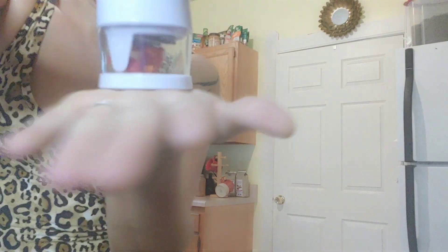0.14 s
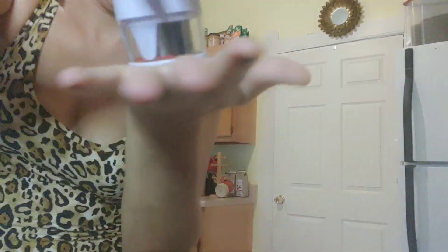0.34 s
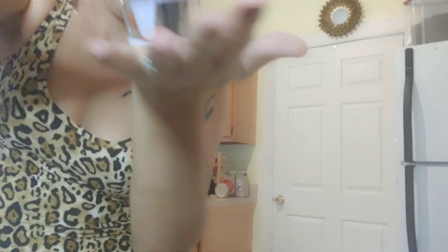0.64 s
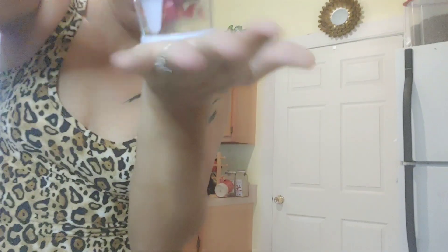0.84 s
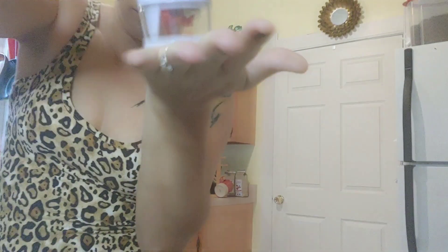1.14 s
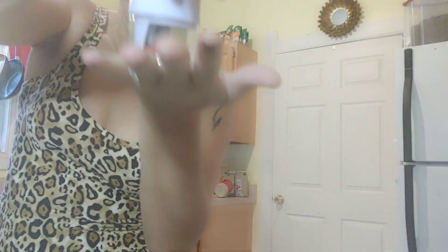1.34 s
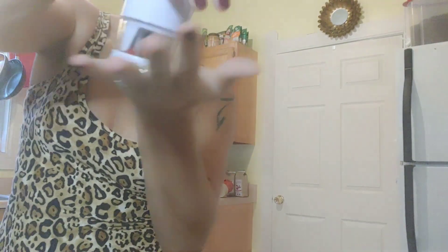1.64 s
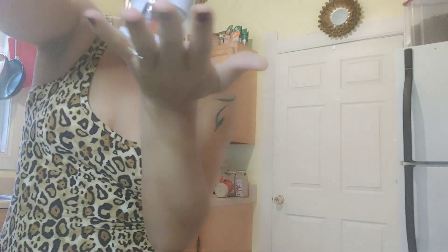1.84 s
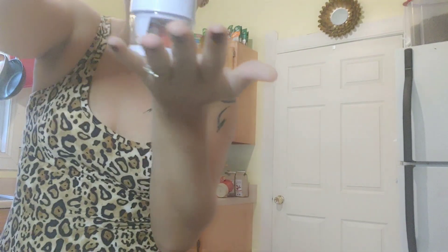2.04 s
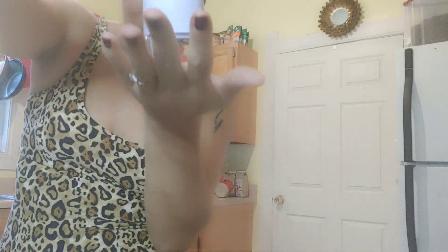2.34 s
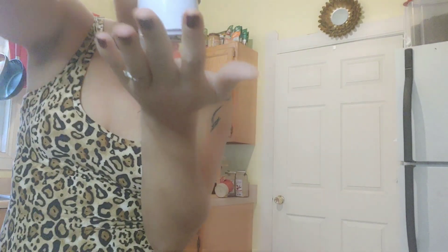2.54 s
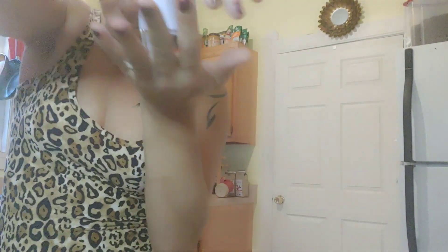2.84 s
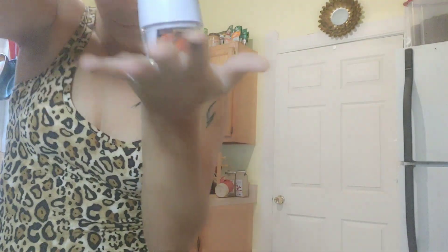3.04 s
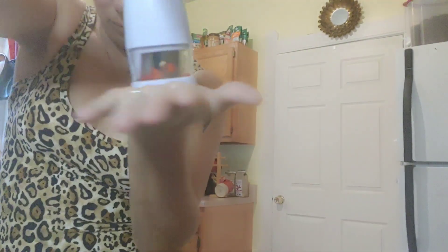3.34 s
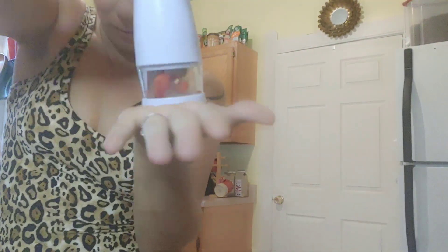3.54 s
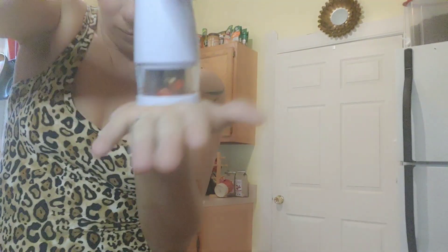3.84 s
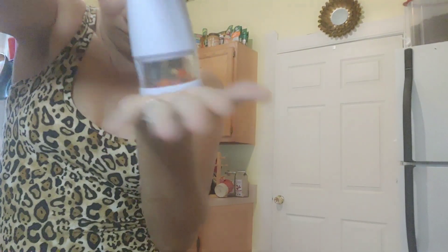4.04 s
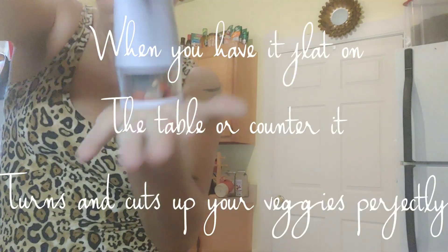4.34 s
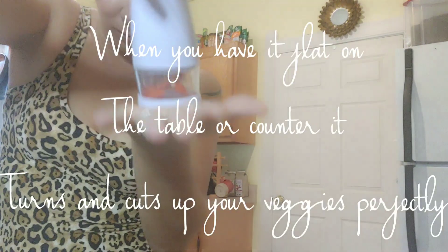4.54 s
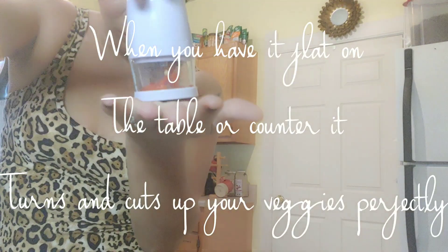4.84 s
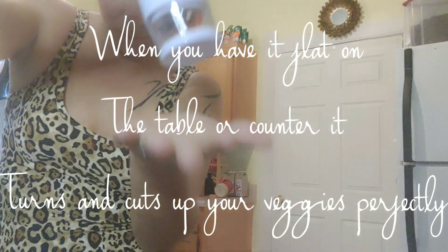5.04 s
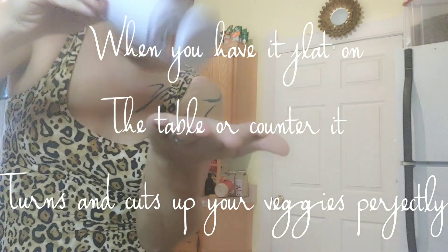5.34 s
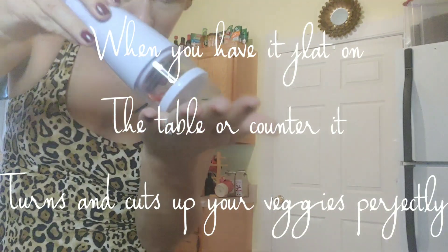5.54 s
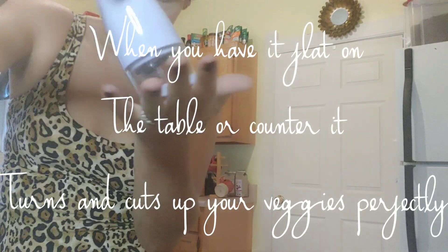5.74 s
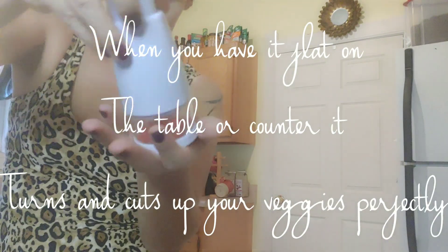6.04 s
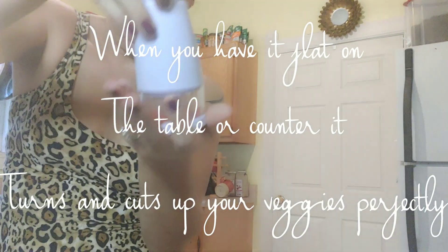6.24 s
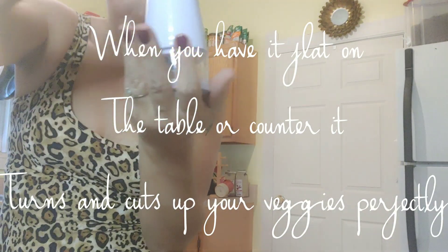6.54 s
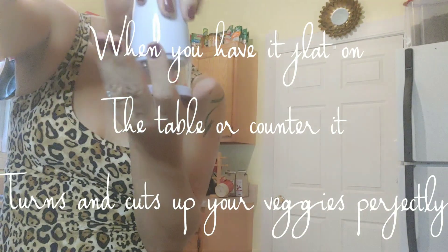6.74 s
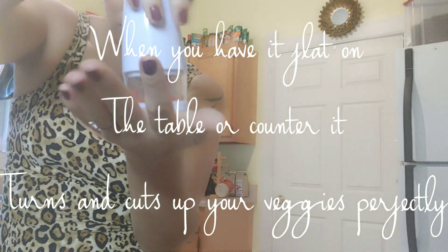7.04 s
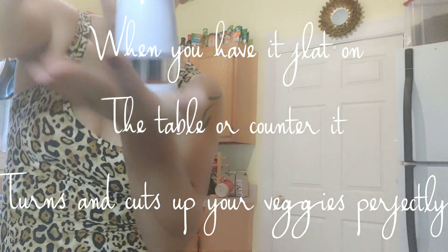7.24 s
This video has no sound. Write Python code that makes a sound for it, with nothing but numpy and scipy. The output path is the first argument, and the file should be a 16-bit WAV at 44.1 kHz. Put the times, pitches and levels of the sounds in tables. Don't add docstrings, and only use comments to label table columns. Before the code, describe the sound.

In a hard-walled kitchen with a low fridge hum, a hand-pumped plastic chopper works close to a stereo phone. From 0.1 to 1.8 s, six pushes about a third of a second apart give hollow, bright plastic knocks; between them the spring drives the plunger back with a gritty scrape, a rising squeak near 2 kHz, a brief steel rasp and a stop click. The clatter dies into short room echoes. From 2.1 s there is only a faint slip and a nail tick at 2.3, the background dipping before 2.8. A sharp return click at 2.8 begins a faster spell, strokes every quarter second from 3.0 until 4.5, with stronger rasps. Small finger knocks and slips come at 5.2 and 5.4, then faint nail ticks. Around 6.45 something hollow is set down across the room with dull double taps. After near quiet, one squeaky return clicks at 7.25.

```python
import sys
import numpy as np
from scipy import signal
from scipy.fft import rfft, irfft, next_fast_len
from scipy.io import wavfile
from scipy.ndimage import uniform_filter1d

SR = 44100
rng = np.random.default_rng(int(sys.argv[2]) if len(sys.argv) > 2 else 0)


def store_wav(level_fs):
    pcm = np.round(np.clip(np.atleast_2d(level_fs), -1, 1) * 32767)
    wavfile.write(sys.argv[1], SR, pcm.T.astype(np.int16))


def ratio(d):
    e = np.asarray(d, float) / 20
    return 10 ** e


N = 325458

# (time [s], force [dB], hardness [dB], cup ring [Hz])
PUSH_KNOCKS = [(.148, -25, 1.5, 937), (.481, -19, 3, 1116), (.818, -21.5, 0, 924), (1.149, -17, 3, 983),
               (1.469, -18.5, -6, 943), (1.796, -21.5, -11, 1014), (3.016, -22.5, -6, 958),
               (3.279, -18, -15, 1035), (3.535, -22, -8.5, 1484), (3.766, -24, -2, 966),
               (3.993, -18, -19, 1398), (4.226, -22.5, 3.5, 954), (4.495, -21, -1, 1100)]
# (time [s], force [dB], hardness [dB], cup ring [Hz])
RETURN_KNOCKS = [(.243, -25, 2, 1191), (.596, -17.5, 0, 1380), (.945, -17.5, 0, 977),
                 (1.26, -24.5, 5.5, 1285), (1.576, -20, 5, 1300), (2.817, -16, -5, 1600),
                 (3.112, -23.5, -1, 1424), (3.372, -28.5, 14, 1103), (3.608, -23.5, -17, 1500),
                 (3.844, -29.5, 15.5, 1706), (4.066, -25, 15.5, 1100), (4.289, -23, 2.5, 1189),
                 (7.26, -29.5, 15.5, 1554)]


def unit(x):
    return x / np.sqrt(np.mean(x ** 2) + 1e-20)


def along(points, hz):
    f, v = np.transpose(points)
    return np.interp(np.log(hz + 1), np.log(f + 1), v)


def filtered(x, response):
    n = x.shape[-1]
    m = next_fast_len(n + 8192)
    return irfft(rfft(x, m) * response(np.fft.rfftfreq(m, 1 / SR)), m)[..., :n]


def ringing(x, modes):
    def response(hz):
        total = 0
        for k, (centre, width, db) in enumerate(modes):
            damping = 1j * hz * width
            total = total + (-1) ** k * ratio(db) * damping / (centre ** 2 - hz ** 2 + damping)
        return total

    click = np.eye(1, 512)[0]
    return filtered(x, response) / np.abs(filtered(click, response)).max()


def diffuse(pair, spectrum):
    # (frequency [Hz], correlation [-1 to 1])
    likeness = [(30, .98), (60, .92), (125, .87), (250, .8), (550, .45), (1500, .05), (15000, 0)]

    def response(hz):
        angle = np.arccos(np.clip(along(likeness, hz), -1, 1)) / 2
        return ratio(along(spectrum, hz)) * [np.cos(angle), np.sin(angle)]

    mid, side = filtered(pair, response)
    return np.array([mid + side, mid - side])


def add(track, s, sound):
    part = track[..., round(s * SR):][..., :sound.shape[-1]]
    part += sound[..., :part.shape[-1]]


def knocks(table, contact_s, gain_db, housing_db, follows, base_db):
    # (frequency [Hz], width [Hz], level [dB])
    cup_base = [(271, 210, -5.5), (653, 45, -.5)]
    # (frequency [Hz], width [Hz], level [dB])
    housing_modes = [(2005, 510, -1.5), (2970, 1137, 2)]
    # (frequency [Hz], width [Hz], level [dB])
    lid_modes = [(4540, 730, -8.5), (5290, 650, -4.5)]
    # (frequency [Hz], width [Hz], level [dB])
    steel_modes = [(6880, 290, 7), (7930, 220, 1.5), (9900, 1800, -20.5), (11900, 1000, -15),
                   (14400, 6200, -29)]
    out, t = np.zeros(N), np.arange(2048) / SR

    def softness(hz):
        dulling = 1 / (1 + 1j * hz / np.array([[1800], [3500], [6500], [14000]])) ** 2
        return dulling / (1 + 200 / (1j * hz + 1)) ** 2

    for s, force_db, hard_db, cup_hz in table:
        grit = ratio(-60 * t / contact_s) * rng.standard_normal(2048)
        ragged = (t == 0) + np.array([[.03], [.08], [.15], [.25]]) * grit
        wall_db = housing_db + follows * hard_db
        shares_db = [[0], [wall_db], [(wall_db + hard_db) / 2 - 3], [hard_db - 10]]
        pushes = filtered(ratio(shares_db) * ragged, softness)
        cup_modes = [(hz, width, db + base_db) for hz, width, db in cup_base]
        cup_modes += [(cup_hz, 160, 0), (cup_hz * 1.4, 350, -3)]
        sound = 4.2 * pushes[2]
        for push, modes in zip(pushes, (cup_modes, housing_modes, lid_modes, steel_modes)):
            sound = sound + ringing(push, modes)
        add(out, s + .0015, ratio(force_db + gain_db) * sound)
    return out


def impacts():
    # (time [s], force [dB], hardness [dB], cup ring [Hz])
    rebounds = [
        (.249, -23.5, -3.5, 1290),
        (4.516, -23, 2, 1030),
    ]
    # (time [s], force [dB], hardness [dB], cup ring [Hz])
    finger_ticks = [(.112, -56, 24, 1310), (.433, -23.5, -10, 1110), (.762, -29, -9, 887),
                    (2.776, -39, -7, 1564), (3.486, -47, 2.5, 1470), (3.947, -29, -13, 1600),
                    (5.242, -23.5, -11, 1360), (5.256, -40, 4, 1100), (5.414, -47, -3, 1400),
                    (5.442, -34.5, -2, 960), (5.458, -38, 2, 1300), (6.654, -52.5, 9.5, 835),
                    (6.688, -48.5, 1, 714), (7.227, -56.5, 10, 1230)]
    down = knocks(PUSH_KNOCKS, .0023, 12.95, housing_db=5.5, follows=.36, base_db=-2)
    back = knocks(RETURN_KNOCKS + rebounds, .0038, 11.4, housing_db=2.5, follows=.2, base_db=-8)
    fingers = knocks(finger_ticks, .0018, 3.8, housing_db=6, follows=.55, base_db=-2.5)
    return down + back + fingers


def travels(squeak_rise_db=10):
    # (time [s], squeak [dB], squeak [Hz])
    slide_starts = [(0.096, -39.5, 2200), (0.216, -25, 2150), (.448, -28, 2274), (.562, -26, 2070),
                    (.767, -45.5, 2140), (.915, -26, 2280), (1.098, -38, 2260), (1.233, -22.5, 2170),
                    (1.436, -40, 1690), (1.541, -25.5, 2240), (1.75, -37, 2270), (2.777, -33, 2035),
                    (2.979, -39, 1660), (3.09, -24, 2030), (3.237, -34, 2104), (3.338, -24, 2120),
                    (3.485, -33.5, 2108), (3.581, -21.5, 1950), (3.725, -33, 2140), (3.82, -25, 1950),
                    (3.94, -37, 2130), (4.042, -21.5, 1950), (4.188, -38, 1810), (4.275, -30, 2337),
                    (4.443, -35.5, 1820), (7.228, -36, 2280)]
    # (start [s], stop [s], scrape [dB], squeak [dB], squeak [Hz])
    small_slips = [
        (2.087, 2.248, -91.5, -61, 2250),
        (5.224, 5.252, -51, -50, 2852),
        (5.436, 5.452, -43, -45, 1998),
    ]
    usual_scrape_db, usual_travel_s, db_per_halving = -32.5, .033, 5.5
    push_rise_db = 1.5
    ends = [(row[0], .0093, push_rise_db) for row in PUSH_KNOCKS]  # (knock s, overrun s, rise dB)
    ends += [(row[0], .002, squeak_rise_db) for row in RETURN_KNOCKS]
    ends.sort()
    for start, squeak_db, squeak_hz in slide_starts:
        knock, overrun, rise_db = next(end for end in ends if end[0] > start)
        scrape_db = usual_scrape_db - db_per_halving * np.log2((knock - start) / usual_travel_s)
        yield start, knock + overrun, scrape_db, squeak_db, squeak_hz, rise_db
    for slip in small_slips:
        yield *slip, push_rise_db


def slides():
    # (frequency [Hz], density [dB per Hz])
    scrape_colour = [(180, -40), (300, -11.5), (749, -5.5), (2210, -0.5), (2700, -9.5), (4300, -4.5),
                     (6200, -11), (6960, -6), (8640, -20), (10600, -18.5), (11700, -16), (12900, -29),
                     (16000, -42.5)]
    ease_in_s, scrape_rise_db = .013, 13
    scrape_t60, squeal_t60 = .065, .035
    slip_scatter = .058
    scrape, squeal = np.zeros(N), np.zeros(N)
    for start, stop, scrape_db, squeak_db, squeak_hz, rise_db in travels():
        travel = stop - start
        t = np.arange(round((travel + 1 / 8) * SR)) / SR
        to_go, after = np.clip(1 - t / travel, 0, 1), np.maximum(t - travel, 0)
        grip = np.clip(t / ease_in_s, 0, 1)
        add(scrape, start, ratio(scrape_db + 8 - scrape_rise_db * to_go - 60 * after / scrape_t60) * grip)

        wander = unit(uniform_filter1d(rng.standard_normal(len(t)), size=50))
        slips_hz = squeak_hz * (1 + slip_scatter * wander)
        flutter_db = 4 * unit(uniform_filter1d(rng.standard_normal(len(t)), size=90))
        squeak = .99 * np.sin(2 * np.pi * np.cumsum(slips_hz) / SR) * ratio(flutter_db)
        low_start = ringing(rng.standard_normal(len(t)), [(.72 * squeak_hz, 350, 0)])
        squeak += .82 * to_go * unit(low_start)
        add(squeal, start, ratio(squeak_db - rise_db * to_go - 60 * after / squeal_t60) * grip * squeak)
    catches = rng.random(N) < 900 / SR
    grains = catches * rng.standard_normal(N) * ratio(3 * rng.standard_normal(N))
    grit = rng.standard_normal(N) + .6 * unit(grains)
    return scrape * unit(filtered(grit, lambda hz: ratio(along(scrape_colour, hz)))) + squeal


def rasps():
    # (time [s], peak [dB], top ring [dB], blade [Hz], length [s])
    cam_turns = [(0.24, -20.5, -6.5, 6740, 0.012), (0.5848, -11, -14, 7210, 0.0044),
                 (0.9337, -20, -8, 7290, 0.011), (1.2604, -13.5, -14, 7580, 0.011),
                 (1.5685, -11, -12.5, 7760, 0.0032), (2.8128, -13, -12, 7260, 0.0031),
                 (3.109, -6.5, -17.5, 7110, 0.0055), (3.362, -4.5, -22, 7100, 0.0053),
                 (3.589, -23.5, -10, 7170, 0.0033), (3.8367, -8, -15.5, 7290, .0037),
                 (4.07, -13, -10.5, 6880, 0.0012), (4.2947, -10, -4, 8050, 0.0021),
                 (4.512, -13, -15, 6850, .01), (7.254, -15, 3, 6800, .008)]
    lid_db = -8.5
    out, t = np.zeros(N), np.arange(2048) / SR
    for s, db, top_db, blade_hz, length in cam_turns:
        swell = np.clip(t / .004, 0, 1) * ratio(-60 * np.maximum(t - length, 0) / .0062)
        modes = [(4400, 600, lid_db), (blade_hz, 650, 0), (blade_hz * 1.1, 500, -7)]
        modes += [(9800, 2500, top_db - 8.5), (11900, 1100, top_db + 6.5)]
        grains = ringing(rng.standard_normal(2048) * swell, modes)
        add(out, s, ratio(db + .5) * grains / np.abs(grains).max())
    return out


def nail_ticks():
    # (time [s], peak [dB], ring [Hz], width [Hz])
    nail_rings = [
        (2.3121, -45, 2533, 600),
        (5.1751, -52, 3400, 900),
        (5.677, -55, 4040, 1200),
        (5.8497, -47.5, 4150, 600),
        (6.3728, -60, 2020, 350),
        (6.9558, -59, 2030, 90),
        (6.9554, -57, 4000, 120),
    ]
    out, click = np.zeros(N), np.eye(1, 2048)[0]
    for s, db, hz, width in nail_rings:
        ring = ringing(ringing(click, [(hz, width, 0)]), [(hz, 1500, 0)])
        add(out, s, ratio(db + 3.5) * ring / 3)
    return out


def far_taps():
    # (time [s], peak [dB], rim [dB])
    set_downs = [
        (6.445, -30.5, -18),
        (6.474, -34, -14),
        (6.497, -47, -2.5),
        (6.51, -48, -8),
    ]
    # (frequency [Hz], width [Hz], level [dB])
    hollow_body = [(257, 55, -8), (579, 65, -1), (900, 580, -12), (1300, 260, -6.5)]
    # (frequency [Hz], width [Hz], level [dB])
    hollow_rim = [(1660, 84, 3.5), (2080, 250, -3), (2740, 930, -12)]
    push, t = np.zeros((2, N)), np.arange(4096) / SR
    for s, db, rim_db in set_downs:
        tap = (t == 0) + .026 * ratio(-60 * t / .088) * rng.standard_normal(4096)
        add(push, s, ratio([[db + .5], [db + rim_db + 15]]) * tap)
    body, rim = filtered(push, lambda hz: 1 / (1 + 1j * hz / 3000) ** 4)
    return ringing(body, hollow_body) + ringing(rim, hollow_rim)


def ports(x, lag_s, scatter, step_s=.11):
    out, n, t = np.zeros((2, N)), round(step_s * SR), np.arange(400) / SR
    for k in range(0, N, n):
        echoes = (rng.random(400) < .15) * rng.standard_normal(400) * ratio(-60 * t / .014)
        echoes -= uniform_filter1d(echoes, size=30)
        paths = (t == 0) + scatter * echoes * [[1], [-1]]
        add(out, k / SR, signal.fftconvolve(x[None, k:k + n], paths, axes=1))
    return filtered(out, lambda hz: np.exp(1j * np.pi * hz * lag_s * np.array([[1], [-1]])))


def kitchen(x, step_s=.25):
    # (frequency [Hz], t60 [s])
    room_t60 = [(200, .6), (800, 0.32), (2000, 0.49), (6000, 0.47), (14000, 0.28)]
    # (frequency [Hz], level [dB])
    wall_colour = [(200, -4.5), (600, 0.5), (1500, -3), (3000, 0.5), (5000, -1.5), (7000, 1.5), (10000, 1),
                   (14000, 3.5)]
    out, n = np.zeros((2, N)), round(step_s * SR)
    for k in range(0, N, n):
        hz, t, z = signal.stft(rng.standard_normal((2, SR * 3 // 5)), SR, nperseg=256)
        decay = ratio(-60 * t / along(room_t60, hz)[:, None])
        tail = signal.istft(z * decay, SR, nperseg=256)[1]
        tail *= np.clip(np.arange(tail.shape[1]) / SR / .0069 - .6, 0, 1)
        add(out, k / SR, signal.fftconvolve(x[None, k:k + n], tail / np.linalg.norm(tail[0]), axes=1))
    return diffuse(out, wall_colour)


def room_tone():
    # (frequency [Hz], density [dB per Hz])
    hum_colour = [(15, -37.5), (25, 0.5), (37, 5.5), (54, 0), (67, -3), (86, -15), (118, -8), (151, -12),
                  (220, -6.5), (249, -8), (279, -9.5), (334, -10), (412, -14), (522, -18), (700, -46),
                  (910, -62), (1540, -120)]
    # (frequency [Hz], width [Hz], level [dB])
    compressor = [(48.5, 3.9, 0.5), (56, 11, -1.5), (120, 22, -7), (225.3, 18, -5), (279.5, 11, -4.5)]
    # (frequency [Hz], density [dB per Hz])
    rustle_colour = [(350, -15), (600, -4), (1210, -5.5), (1530, -9.5), (2230, -10.5), (2730, -14),
                     (3400, -13.5), (4420, -42.5), (7480, -120)]
    # (frequency [Hz], density [dB per Hz])
    hiss_colour = [(1760, -34), (3000, -12), (3830, -3.5), (4470, -5.5), (6300, -12), (7200, -3),
                   (8880, -21.5), (11700, -15), (13300, -25), (16000, -29)]
    # (start [s], hold [s], effort [dB])
    hand_work = [
        (-.1, 2.03, 14),
        (2.1, 0.31, 3),
        (2.756, 1.91, 14.5),
        (5.222, 0.027, 18.5),
        (5.419, 0.027, 19.5),
        (6.642, 0.015, 10.5),
        (7.21, .2, 10),
    ]
    # (start [s], end [s], depth [dB])
    gate_spells = [
        (2.55, 2.762, -10.5),
        (6.088, 6.648, -10),
        (6.763, 7.213, -9.5),
    ]
    gate_edge_s = .02
    grip_s, let_go_db_per_s = .018, 134.5
    rustle_follows = .55
    hum_db, rustle_db, hiss_db = -46, -59.5, -69.5
    t = np.arange(N) / SR

    gate_db, effort_db = np.zeros(N), np.zeros(N)
    for start, end, db in gate_spells:
        gate_db += db * np.clip(np.minimum(t - start, end - t) / gate_edge_s + .5, 0, 1)
    for start, hold, db in hand_work:
        rise = db * np.clip((t - start) / grip_s, 0, 1)
        fall = let_go_db_per_s * np.maximum(t - start - hold, 0)
        effort_db = np.maximum(effort_db, rise - fall)

    def layer(spectrum):
        return unit(diffuse(rng.standard_normal((2, N)), spectrum))

    drone = ringing(rng.standard_normal((2, N)), compressor)
    drone = unit(diffuse(drone, [(30, .5), (300, -1.5), (500, -16), (900, -58)]))
    fridge = ratio(-.5) * layer(hum_colour) + ratio(-4) * drone
    rustle = ratio(rustle_db + rustle_follows * effort_db) * layer(rustle_colour)
    hiss = ratio(hiss_db + effort_db) * layer(hiss_colour)
    return ratio(gate_db) * (ratio(hum_db) * fridge + rustle + hiss)


def scene():
    hits, travel, blade, nails, far = impacts(), slides(), rasps(), nail_ticks(), far_taps()
    near = ratio(-.5) * ports(hits + nails + blade + travel + far, lag_s=4.2 / SR, scatter=.29)
    sent = ratio(-4) * hits + ratio(-5) * blade + ratio(-5.5) * travel + ratio(.5) * far + ratio(-9) * nails
    answer = kitchen(sent)
    start, length = round(1.31 * SR), round(.125 * SR)
    add(answer, 0, ratio(-6) * answer[:, start:start + length] * np.linspace(1, .3, length))
    return near + answer + room_tone()


def roll_off(x):
    return signal.sosfilt(signal.butter(12, 16460, fs=SR, output="sos"), x)


def record(dry):
    # (frequency [Hz], left minus right [dB])
    port_lean = [(60, 0.9), (92, 1.3), (140, -0.5), (210, 1), (330, 1), (500, -3.5), (770, 6.5), (1170, 0),
                 (1790, -5), (2740, -2.5), (4190, 3), (6410, -6.5), (9810, 2.5), (15000, 3.5)]
    # (low edge [Hz], high edge [Hz])
    phone_band = (36, 15950)
    tilted = filtered(dry, lambda hz: ratio(along(port_lean, hz) / 2 * np.array([[1], [-1]])))
    rounded = tilted / (1 + np.abs(tilted / .8) ** 4) ** (1 / 4)

    def band(hz):
        return (hz < phone_band[1]) / (1 + (phone_band[0] / (hz + 1)) ** 8)

    return roll_off(filtered(rounded, band))


dry = scene()
out = record(dry)
store_wav(out)
```